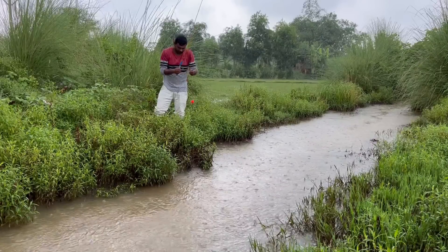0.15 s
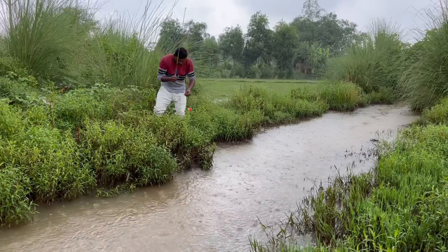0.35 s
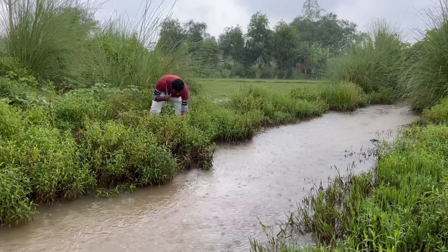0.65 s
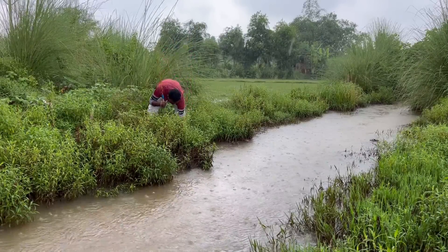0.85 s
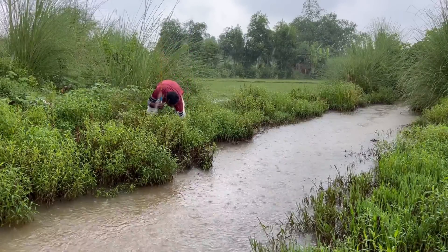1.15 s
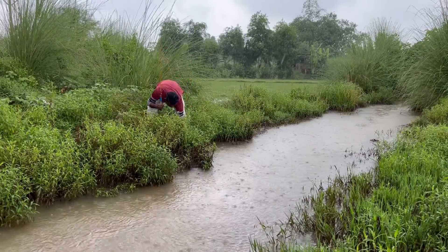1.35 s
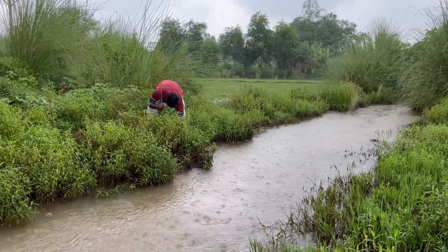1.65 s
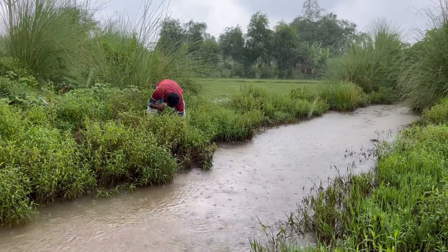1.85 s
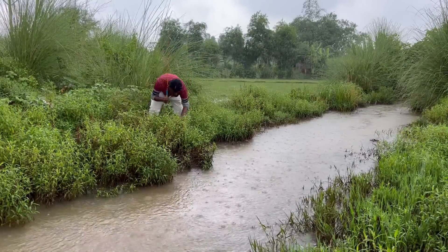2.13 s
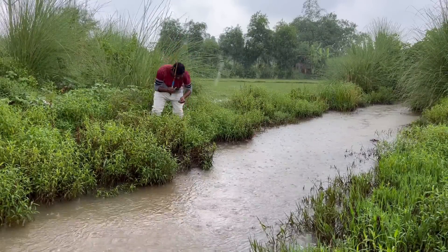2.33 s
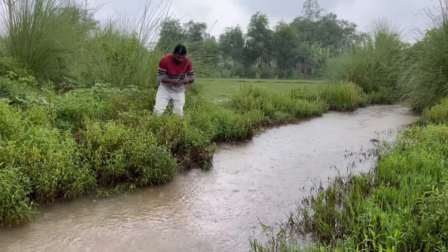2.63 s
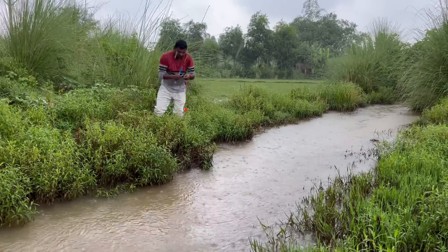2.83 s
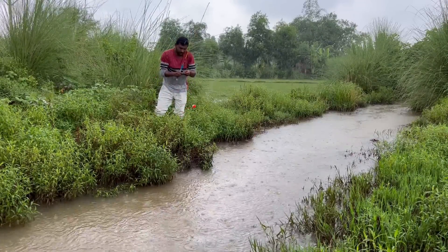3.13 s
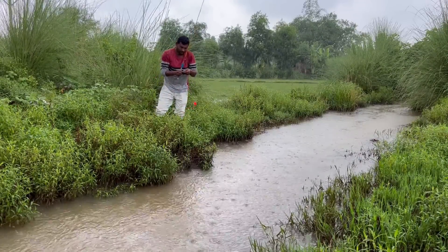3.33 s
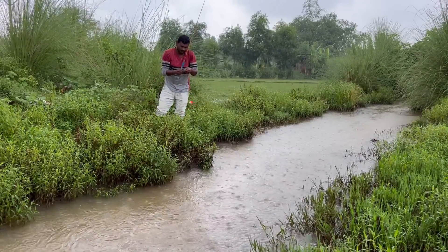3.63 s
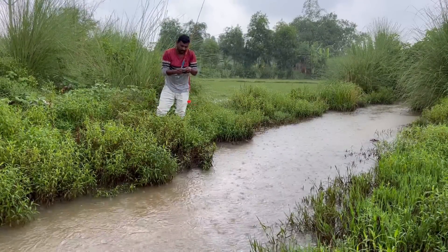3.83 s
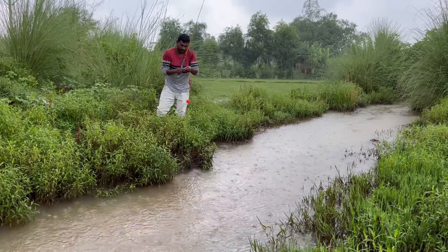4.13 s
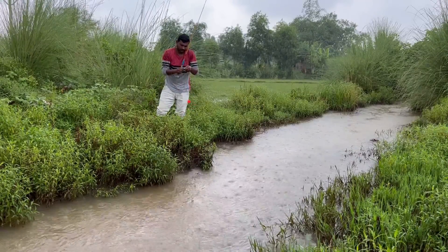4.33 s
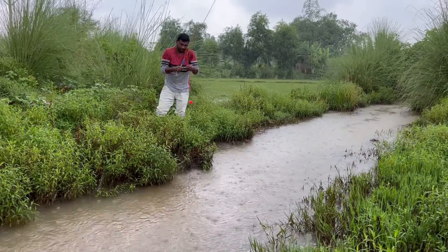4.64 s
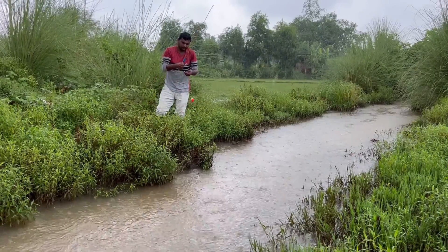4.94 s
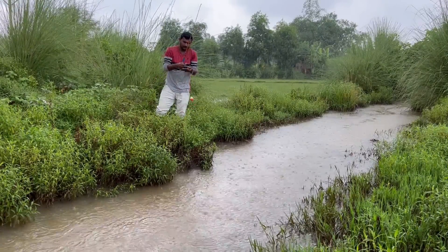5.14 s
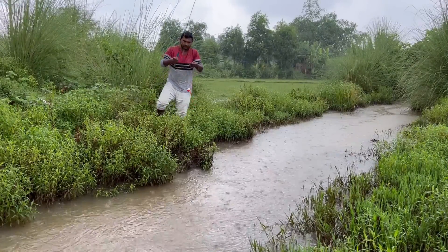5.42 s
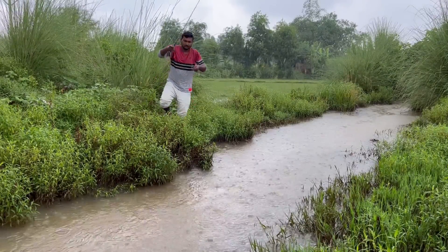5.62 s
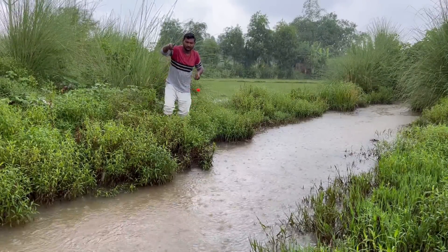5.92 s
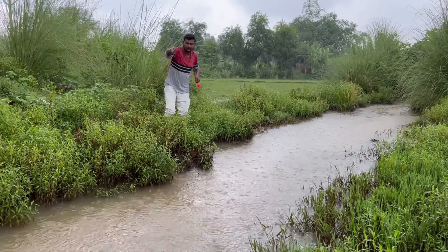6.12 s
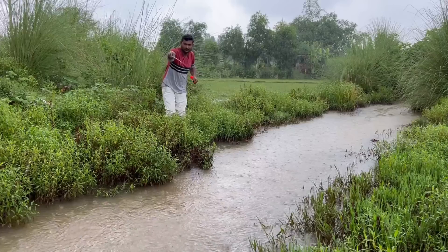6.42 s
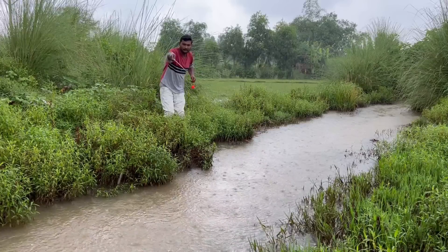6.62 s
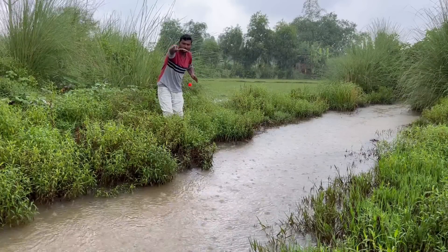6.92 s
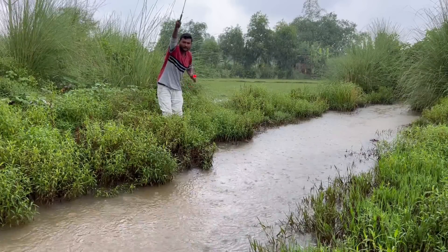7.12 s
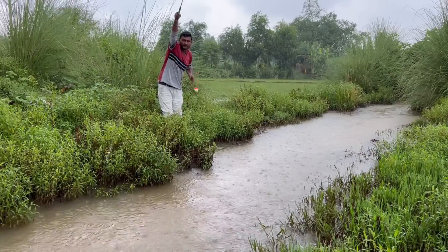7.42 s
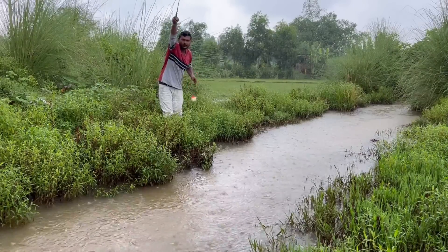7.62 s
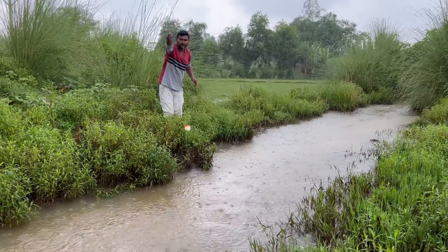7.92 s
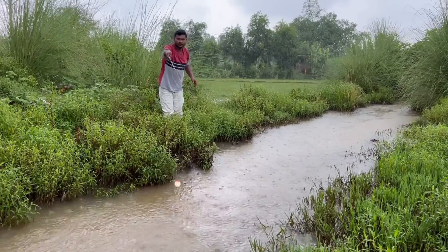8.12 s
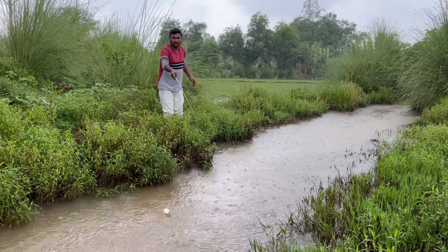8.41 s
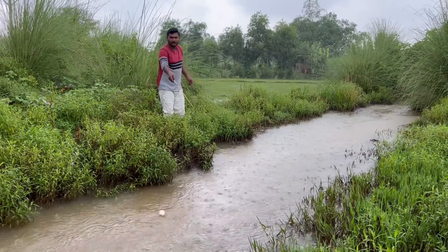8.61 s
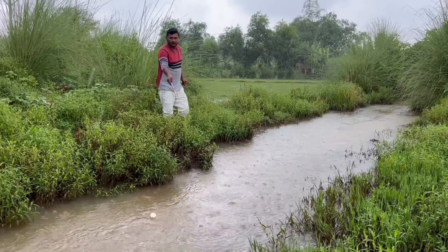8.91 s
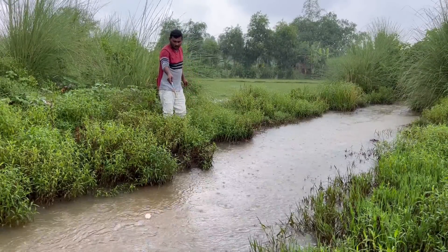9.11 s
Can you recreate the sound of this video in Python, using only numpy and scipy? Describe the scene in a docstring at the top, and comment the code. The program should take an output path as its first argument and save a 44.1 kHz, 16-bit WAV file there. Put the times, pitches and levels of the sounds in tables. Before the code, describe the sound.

Continuous soft rain falls on a muddy canal and its grassy banks, a wide, even hiss full of fine patter. Near drops give tiny bright pings in water and crisp ticks on leaves. Now and then a heavy drop thumps an umbrella-like cloth close to the stereo microphone, strongest past the middle. A quiet low rumble lies underneath, with a very faint high insect chirp at times.

```python
"""Steady rain on a canal and its grassy banks, heard by two microphone ports under an umbrella.
Far rain is patchy shaped noise; near drops tick on leaves as noise puffs and ring as rising bubbles in the water.
Heavy drops thud on the canopy: a taut note or falling glide, with swaying ribs, a wet slap and spatter.
A low rumble with a wavering hum, both noise bands, lies underneath; an insect chirps in narrow-band noise."""
import sys
import numpy as np
from scipy import signal
from scipy.fft import rfft, irfft, next_fast_len
from scipy.io import wavfile
from scipy.ndimage import uniform_filter1d

SR = 44100
rng = np.random.default_rng(int(sys.argv[2]) if len(sys.argv) > 2 else 0)


def pcm_store(signal):
    """Save signal as 16-bit PCM."""
    levels = np.round(np.clip(np.atleast_2d(signal), -1, 1) * 32767)
    wavfile.write(sys.argv[1], SR, levels.astype(np.int16).T)


N = 408366


def amp(db):
    """Logarithmic level: decibels to amplitude gain."""
    return 10 ** (np.asarray(db) / 20)


def unit(x):
    """Power normalisation: x at rms 1."""
    return x / np.sqrt(np.mean(x ** 2) + 1e-20)


def columns(rows, at):
    """Linear interpolation: each column after the first, read at the given places."""
    key, *cols = np.transpose(rows)
    return [np.interp(at, key, c) for c in cols]


def filtered(x, response):
    """Linear filtering: the spectrum of x times a complex response of frequency."""
    m = next_fast_len(N + 8192)
    return irfft(rfft(x, m) * response(np.fft.rfftfreq(m, 1 / SR)), m)[..., :N]


def coloured(x, spectrum):
    """Spectral shaping: x filtered through (pitch_hz, gain_db) points on a log axis."""
    f, db = np.transpose(spectrum)
    return filtered(x, lambda hz: amp(np.interp(np.log(hz + 1), np.log(f), db)))


def placed(s, waves):
    """Superposition: rows of short waves summed at their start times."""
    at = np.round(s * SR).astype(int)[:, None] + np.arange(waves.shape[1])
    return np.bincount(at.ravel(), waves.ravel(), N + SR)[:N]


def patchy(depth_db, bins, frames):
    """Shared modulation: three independent noises under one time-frequency field of random gain."""
    z = signal.stft(rng.standard_normal((3, N)), nperseg=512)[2]
    field = rng.standard_normal(z.shape[1:])
    field = uniform_filter1d(uniform_filter1d(field, bins, 0), frames, 1)
    return signal.istft(z * amp(depth_db * unit(field)), nperseg=512)[1][:, :N]


# spectrum of the far rain: pitch_hz [Hz], density_db [dB per Hz, relative]
HISS_SPECTRUM = [(150, -8.5), (350, -3), (650, 3.5), (1000, 2.5), (1640, 1.5), (1740, -5), (2800, -5.5),
                 (5000, -11), (6300, -11.5), (7500, -16), (9000, -11.5), (11000, -16), (15700, -15.5),
                 (15900, -50)]
HISS_DB = -45.5  # steady rms level


def hiss():
    """Incoherent summation: countless far drops merge into shaped noise, one shared and two separate fields."""
    return amp(HISS_DB) * unit(coloured(patchy(1.82, 8, 6), HISS_SPECTRUM))


# spectrum of the rumble: pitch_hz [Hz], density_db [dB per Hz, relative]
RUMBLE_SPECTRUM = [(20, -50), (30, -22), (45, -7), (70, -2.5), (135, -3), (200, -3.5), (260, -8),
                   (365, -11), (500, -17.5), (700, -58), (1100, -120)]
# slow course of the rumble: start_s [s], level_db [dB]
RUMBLE_LEVEL = [(0, -51), (1.2, -49.5), (2.7, -52), (3.6, -49.5), (4.8, -50), (7, -50), (9.26, -49.5)]


def rumble():
    """Band-limited noise: low-pitched fields under a slowly varying level."""
    level_db, = columns(RUMBLE_LEVEL, np.arange(N) / SR)
    return amp(level_db) * unit(coloured(patchy(2.35, 2, 12), RUMBLE_SPECTRUM))


def bubbles(s, db, hz, cycles, rise, swell=3, size=800):
    """Bubble resonance: each swells, rings out and rises in pitch as it nears the surface."""
    life = np.arange(size) / SR * (hz / cycles)[:, None]  # time in lifetimes
    shape = 2.6 * (1 - np.exp(-life * swell)) ** 2 * np.exp(-life * 1.1 - .3 * life * life)
    # the pitch starts below nominal and passes it near the crest
    climb = life + rise[:, None] * (life - 1.4) * life / (1 + life / 2)
    return placed(s, amp(db)[:, None] * shape * np.sin(2 * np.pi * cycles[:, None] * climb))


# bright part of a tick: pitch_hz [Hz], gain_db [dB]
SPRAY_SPECTRUM = [(3000, -50), (6000, -34), (9000, 1.5), (16000, -1)]
# dull part of a tick: pitch_hz [Hz], gain_db [dB]
SPLAT_SPECTRUM = [(400, -35), (1200, 16), (4000, 13), (7000, 6.5), (12000, -31)]
SPRAY_TAIL_DB, SPRAY_TAIL_T60_S = -23.5, 0.042  # fine spray settling after a tick
TICK_BUILD_S = 0.0012


def ticks(s, db, t60, dull_db, size=800):
    """Impact noise: a puff builds as the drop flattens, dies in milliseconds and leaves a weak tail."""
    t = np.arange(size) / SR
    build = np.clip(t / TICK_BUILD_S, 0, 1) ** 9
    fade = amp(db[:, None] - 60 * np.maximum(t - TICK_BUILD_S, 0) / np.abs(t60)[:, None])
    tail = amp(db[:, None] + SPRAY_TAIL_DB - 60 * t / SPRAY_TAIL_T60_S)
    puffs = build * (fade + tail) * rng.standard_normal((len(s), size))
    bright = coloured(placed(s, puffs), SPRAY_SPECTRUM)
    dull = coloured(placed(s, puffs * amp(dull_db)[:, None]), SPLAT_SPECTRUM)
    return bright + dull


def patter(db, count_bubbles, count_ticks):
    """Random arrivals: small drops fall at uniform random times, a few up to some 15 dB louder than most."""
    s, a, b, c, d = rng.random((count_bubbles, 5)).T
    hz = 600 * (7000 / 600) ** a
    cycles = 2.18 + 13 * c ** 1.6
    # low or long-lived bubbles are weaker; high ones start sharply
    level_db = db + (11 + 3.16 * a) * b ** 4 - 3 * c
    swell = 3.2 * (hz[:, None] / 1000) ** 0.94
    water = bubbles(s * N / SR, level_db, hz, cycles, 0.39 * d, swell=swell)
    s, a, b, c = rng.random((count_ticks, 4)).T
    leaves = ticks(s * N / SR, db - 2.5 + 14.7 * a ** 4, 0.0022 + 0.028 * b, 9 * c - 10)
    return water + leaves


# fuzzy hum inside the rumble: start_s [s], level_db [dB], pitch_hz [Hz, band centre]
HUM_COURSE = [(0, -45.5, 130.2), (.55, -68, 125), (1, -50, 155), (1.35, -54.5, 135.5), (1.75, -53, 140.5),
              (2.6, -62.5, 140.3), (4, -54, 130), (4.45, -71, 140), (4.8, -47.5, 153), (5.3, -64, 145),
              (6.2, -53, 138.6), (6.55, -62, 135.3), (6.95, -55, 150), (7.5, -60, 150.6),
              (8.15, -55, 128.8), (9.26, -56, 135)]
HUM_WIDTH_HZ = 17  # from the centre to the 1/e point of the amplitude response


def hum():
    """Quadrature modulation: two slow noises on a wandering carrier make a narrow band around it."""
    db, hz = columns(HUM_COURSE, np.arange(N) / SR)
    a, b = filtered(rng.standard_normal((2, N)), lambda f: np.exp(-(f / HUM_WIDTH_HZ) ** 2))
    phase = 2 * np.pi * np.cumsum(hz) / SR
    return amp(db) * unit(a * np.cos(phase) + b * np.sin(phase))


# bouts of chirps: start_s [s, may precede the scene], chirps [count], level_db [dB before gating]
INSECT_BOUTS = [(-.065, 3, -64), (.13, 4, -63), (3.95, 5, -69), (6.425, 5, -68), (7.07, 17, -62.5)]
CHIRP_S = .129  # from chirp to chirp


def insect():
    """Gated narrow-band noise: a band around one pitch opens and closes in even chirps."""
    t, gate = np.arange(N) / SR, np.zeros(N)
    for s, count, db in INSECT_BOUTS:
        turn = (t - s) / CHIRP_S
        pulse = np.clip(np.sin(2 * np.pi * turn) * 2 + .5, 0, 1)
        gate += amp(db) * ((turn > 0) & (turn < round(count))) * pulse
    band = filtered(rng.standard_normal(N), lambda hz: np.exp(-((hz - 8830) / 80) ** 2))
    return gate * unit(band)


# pings of near drops and the bubbles they trap:
# start_s [s], level_db [dB, nominal], pitch_hz [Hz, nominal], life [cycles]
NEAR_BUBBLES = [(.017, -34.5, 2740, 4.5), (.2121, -35, 2380, 6.7), (.32, -36, 5530, 5),
                (.386, -38, 6500, 6), (0.4664, -31, 3860, 5.3), (.791, -35, 3660, 3.7),
                (1.057, -40, 4190, 6), (.7293, -34, 6720, 2.5), (1.421, -36, 2350, 4.2),
                (1.456, -41, 4520, 5), (1.545, -46, 1400, 4), (1.552, -37, 1130, 6.3),
                (1.698, -41, 1110, 2.6), (1.6615, -29, 2760, 1.4), (1.7025, -40, 3400, 7),
                (1.9767, -25, 3200, 4), (1.98, -36, 3500, 8), (1.988, -40, 3000, 6),
                (2.006, -41, 1980, 3.9), (2.074, -39, 3600, 5), (2.329, -37.5, 2080, 11),
                (2.4389, -27, 4900, 1.9), (2.48, -27, 1640, 2.8), (2.4973, -32, 1620, 2.4),
                (2.5283, -33, 4310, 2.6), (2.7743, -29, 7490, 2.3), (2.9621, -35.5, 2680, 6.6),
                (3.4335, -36, 2290, 11), (3.5375, -31, 4300, 3.9), (3.611, -38, 2350, 6.2),
                (3.7144, -27.5, 4870, 2.2), (4.0935, -21, 4200, 0.76), (4.1595, -37, 3200, 7.3),
                (4.1917, -30, 5200, 1.6), (4.241, -40, 4430, 8), (4.248, -38, 2540, 6.3),
                (4.2795, -31, 5330, 1.6), (4.328, -35, 6100, 5), (4.3991, -34, 5170, 3.8),
                (4.5755, -31.5, 4330, 2.5), (4.588, -42, 3000, 8), (4.8406, -32.5, 3800, 2.8),
                (5.0325, -27, 3500, 1.8), (5.1983, -37, 2290, 4), (5.201, -39, 1590, 4.6),
                (5.201, -41, 480, 1.7), (5.204, -41, 2300, 6), (5.225, -40, 2960, 4.2),
                (5.369, -35, 3700, 3.3), (5.453, -33, 6200, 2.5), (5.4942, -29, 1950, 3.4),
                (5.495, -36, 3730, 2.8), (5.4944, -30, 1150, 1.23), (5.4948, -13, 7900, 2.2),
                (5.5411, -39, 1380, 2), (5.571, -40, 4930, 9), (5.8019, -35, 4730, 3.8),
                (5.975, -42, 1430, 7.3), (5.989, -38, 4520, 7), (6.085, -40, 1700, 6),
                (6.264, -38, 3030, 7), (6.355, -39, 1730, 7), (6.3953, -32.5, 3720, 6.6),
                (6.629, -38, 3190, 7.3), (7.0012, -30, 7490, 2.5), (7.001, -24.5, 905, 1.53),
                (7.0014, -36, 1800, 1.3), (7.0014, -41, 4200, 2), (7.0012, -21.5, 2800, 2.9),
                (7.029, -43, 1400, 3), (7.2296, -33, 3530, 6), (7.2977, -40, 3720, 8.3),
                (7.38, -35, 7490, 2.8), (7.603, -41, 1660, 6), (7.78, -33, 4370, 2.8),
                (7.893, -35.5, 3040, 10), (8.2363, -32, 7490, 2.5), (8.312, -34, 2480, 3),
                (8.369, -41, 3400, 8.7), (8.7208, -30.5, 4000, 2.7), (8.7818, -30, 3960, 2.3),
                (9.0798, -36, 7490, 3.9), (9.084, -36, 2100, 2.7), (9.109, -30, 2920, 2),
                (9.16, -38.5, 4190, 9), (9.192, -41, 1750, 6.2)]
RISE_AT_1K = 0.42  # strength of the pitch rise at 1 kHz


def near_bubbles():
    """Bubble resonance: single pings at set times; higher, smaller bubbles rise less."""
    s, db, hz, cycles = np.transpose(NEAR_BUBBLES)
    return bubbles(s, db, hz, cycles, RISE_AT_1K * (1000 / hz) ** 2.3)


# heavy drops on the canopy: start_s [s], level_db [dB, crest of the cloth], pitch_hz [Hz, before any fall],
# fall [octaves per cycle], crest [cycles], pan_db [dB, left minus right], tautness [0-1],
# slap_db [dB, relative to level_db, before shaping]
THUDS = [(1.016, -41, 623, 0.31, 1.2, 5, 0.3, 3), (1.69, -41, 160, 0.66, 1, 2, 0.6, -20),
         (1.698, -35.5, 640, 0.58, 1.2, 4, 0.7, 3), (2.479, -49, 800, 0.8, 1.6, -5, 0.2, 14),
         (2.813, -42, 603, 0.64, 2.3, -3, 0.6, 11), (4.0938, -25.5, 590, 1.14, 1.5, 2, 0.22, -14),
         (4.81, -40, 156, 0.097, 1.3, 3, 0, -20), (5.1986, -32, 1010, 0.3, 1.4, 2, 0.5, 4),
         (5.452, -35.5, 580, 1, 1.54, 4, 0.04, 6.5), (5.4946, -16.5, 523, 1.6, 1.7, 2.5, 0.72, -9.5),
         (5.778, -39.5, 590, 0.48, 1.2, 4, 0.4, 10.5), (5.815, -41.5, 790, 0.91, 1.14, 1, 0.1, 11),
         (5.895, -41.5, 500, 0.57, 1.04, 5, 0, 9), (6.577, -37, 1180, 0.14, 2, -2, .3, 5.5),
         (6.832, -38, 1020, 0.074, 1.5, -3, .3, 5), (6.866, -38, 121, 0.2, 0.91, 2, .4, -20),
         (7.0022, -24, 542, 1.5, 2.57, 4, 0.95, -1), (7.028, -43.5, 700, 0.59, 1.3, 0, .1, 12),
         (7.327, -40.5, 650, .3, 2.06, 4, 0.5, 2), (7.779, -38.5, 646, 0.17, 1.5, 2, 0.1, 9),
         (7.9787, -29, 270, 1.2, 1.25, 3, 0, -20), (8.481, -35.5, 212, 0.66, 1.5, 3, 0.96, -20),
         (8.7951, -19, 323, 0.97, 1.27, 2, 0, -26), (9.028, -39, 112, 0.62, 1, 6, 0.5, -20)]
# wet slap on cloth: pitch_hz [Hz], gain_db [dB]
SLAP_SPECTRUM = [(250, -14), (500, 6.5), (1100, 7), (1700, -11), (2600, -4), (5000, -20)]
STOP_SHARP, STOP_CYCLES = 4.2, 0.89  # how abruptly and how soon after the crest the taut note stops
GLIDE_CYCLES = 3.9  # decay scale of the glide, in cycles of the starting pitch
SWAY_DB, SWAY_T60_S = -12, .11  # sway level before its build-up and tautness scaling; decay
SWAY_HZ, SWAY_FALL_S = 77, 0.0059  # last pitch; time scale of the fall to it


def canopy():
    """Membrane vibration: a blow builds to a crest; taut cloth holds its note and stops short,
    slack cloth glides down, each cycle longer than the last; the ribs sway ever slower."""
    s, db, hz, fall, crest, pan_db, taut, slap_db = np.transpose(THUDS)[..., None]
    t = np.arange(4000) / SR
    u, k, taut = t * hz, np.log(2) * np.abs(fall), np.clip(taut, 0, 1)
    before, after = np.minimum(u - crest, 0), np.maximum(u - crest, 0)
    stop = np.exp(-(after / STOP_CYCLES) ** STOP_SHARP)
    note = stop * np.cos(2 * np.pi * (before + after))
    decay = np.exp(-(after / GLIDE_CYCLES) ** 1.4)
    glide = decay * np.cos(2 * np.pi * (before + np.log1p(k * after) / k))
    cloth = (1 + before / crest) ** 0.85 * (taut * note + (1 - taut) * glide)

    turns = SWAY_HZ * t + 0.62 * hz * SWAY_FALL_S * (1 - np.exp(-t / SWAY_FALL_S))
    sway = amp(SWAY_DB - 60 * t / SWAY_T60_S) * (1 - np.exp(-t / 0.0079)) ** 2
    ribs = sway * np.sin(2 * np.pi * turns) * (0.33 + taut ** 3)
    wet = amp(slap_db - 60 * t / 0.035)
    sides = []
    for side in (1, -1):  # left, right
        side_db = db + side * pan_db / 2
        gain = amp(side_db)
        slap = placed(s[:, 0], gain * wet * rng.standard_normal(u.shape))
        drops = spatter(s[:, 0], (side_db + slap_db)[:, 0], count=5)
        sides.append(placed(s[:, 0], gain * (cloth + ribs)) + coloured(slap, SLAP_SPECTRUM) + drops)
    return np.array(sides)


SPATTER_DB, SPATTER_S = -6, 0.013  # highest level over the slap; scale of the random delay


def spatter(s, db, count):
    """Secondary impacts: a burst drop scatters droplets, the later the weaker, each a short ring."""
    a, b, c = rng.random((len(s), count, 3)).T
    late = -SPATTER_S * np.log(1 - .95 * a)
    level_db = db + SPATTER_DB - 400 * late - 6 * c
    hz = 500 * 4.9 ** b
    return bubbles((s + late).ravel(), level_db.ravel(), hz.ravel(), (0.86 + 3 * c).ravel(),
                   np.zeros(a.size))


# drops splitting on leaves: start_s [s], level_db [dB before shaping], dull_db [dB, dull part relative to level_db]
NEAR_TICKS = [(1.1149, -33, -14), (1.3064, -34, -17), (1.4532, -30, -16), (1.7779, -35, -19),
              (1.978, -27, -24), (2.0767, -32, -21), (2.4588, -30.5, -8), (2.6721, -32.5, -10),
              (2.773, -27, -14), (3.114, -37, -13), (3.3303, -37, -15), (3.8616, -36, -21),
              (4.041, -30.5, -22), (4.26, -32, -13), (4.8519, -30, -25), (5.198, -28, -11),
              (5.4938, -32.5, -4.5), (6.199, -37, -10), (6.785, -27, -30), (7.001, -33, -7),
              (7.7772, -33, -13), (8.2352, -28, -22), (8.546, -35, -19), (9.0788, -20.5, -29)]
TICK_T60_S = 0.0041


def near_ticks():
    """Impact noise: single drops split on leaves at set times."""
    s, db, dull_db = np.transpose(NEAR_TICKS)
    return ticks(s, db, np.full(len(s), TICK_T60_S), dull_db)


# the two ports, low and middle range:
# pitch_hz [Hz], likeness [0-1], lead [rad, left], balance_db [dB, left minus right]
PORTS = [(30, 1, 0, 1), (156, 0.81, 0.4, 0.5), (345, 0.77, 1, 1.5), (513, 0.62, 2, 0.5), (705, 0.6, 3, 3),
         (1190, 0.62, 3, -0.5), (1662, 0.68, 3.5, -2.5), (1707, 0.7, 0.6, 2.5), (3300, 0.19, 1.27, 2),
         (3870, 0.01, 0.9, 4), (5220, 0.7, 1, 8), (5440, 0.26, -1.3, 2), (7200, 0.57, -1.5, 4.5),
         (7540, 0, -2, -7.5)]
# treble pitches where the two channels are in turn opposed, in step, opposed, and most alike: pitch_hz [Hz]
STEPS_HZ = (8190, 11720, 15660)
STEP_WIDTH_HZ, LOOSE = 880, 0.97  # half width of a step; likeness between steps


def port_link(hz):
    """Interchannel coherence: likeness, left lead and balance between the channels at each frequency, from the
    ports below the treble and in alternating steps above."""
    alike, lead, balance_db = columns(PORTS, hz)
    off = [(hz - step_hz) / STEP_WIDTH_HZ for step_hz in STEPS_HZ]
    step = sum(np.exp(-u ** 4) for u in off)
    # the phase holds across each step and slides on between them
    edges = np.add.outer(STEPS_HZ, [-STEP_WIDTH_HZ / 2, STEP_WIDTH_HZ / 2]).ravel()
    held = np.repeat(-np.pi * np.arange(1, 4), 2)
    top_hz, _, top_lead, _ = PORTS[-1]
    lag = np.interp(hz, [top_hz, *edges], [top_lead, *held])
    treble = hz > top_hz
    alike = np.where(treble, LOOSE + (.997 - LOOSE) * step, alike)
    return alike, np.where(treble, lag, lead), balance_db * ~treble


def ports(shared, left, right, near):
    """Partial coherence: shared sound arrives with a phase lead, the rest is each port's own; near reaches both."""
    def response(hz):
        alike, lead, balance_db = port_link(hz)
        alike, half = np.clip(alike, 0, 1), amp(balance_db / 2)
        turn, both, own = half * np.exp(.5j * lead), np.sqrt(alike), np.sqrt(1 - alike)
        # a near drop strikes both ports in step in the low range
        close = half * np.exp(.5j * lead * np.clip((hz - 1800) / 2500, 0, 1))
        return [close, 1 / close, both * turn, both / turn, own * half, own / half]
    heard = filtered(np.array([near, near, shared, shared, left, right]), response)
    return heard.reshape(3, 2, N).sum(axis=0)


def scene():
    """Superposition: the wide rain field and near sounds through the ports, plus the canopy overhead."""
    far_patter = [patter(-55.5, count_bubbles=3500, count_ticks=1200) for field in range(3)]
    shared, left, right = hiss() + rumble() + far_patter
    near = patter(-56.5, count_bubbles=1400, count_ticks=250) + hum() + insect()
    near = near + near_bubbles() + near_ticks()
    return ports(shared, left, right, near) + canopy()


TOP_HZ = 16490  # band limit


def record(dry):
    """Band limiting: a 30 Hz first-order high-pass drops the deepest bass; nothing passes above the limit."""
    return filtered(dry, lambda hz: (hz < TOP_HZ) * 1j * hz / (1j * hz + 30))


dry = scene()
out = record(dry)
pcm_store(out)
```